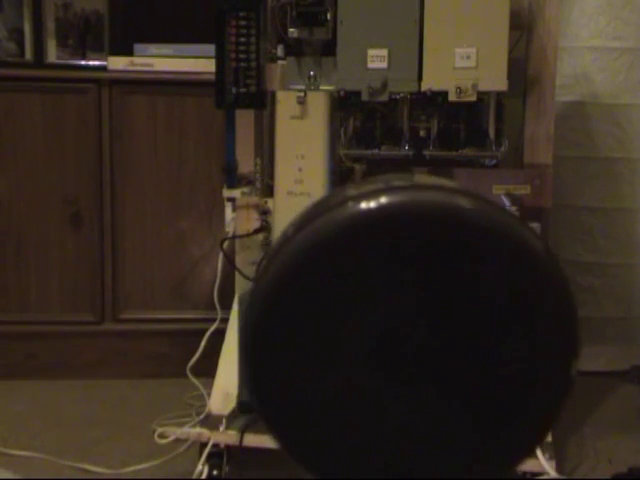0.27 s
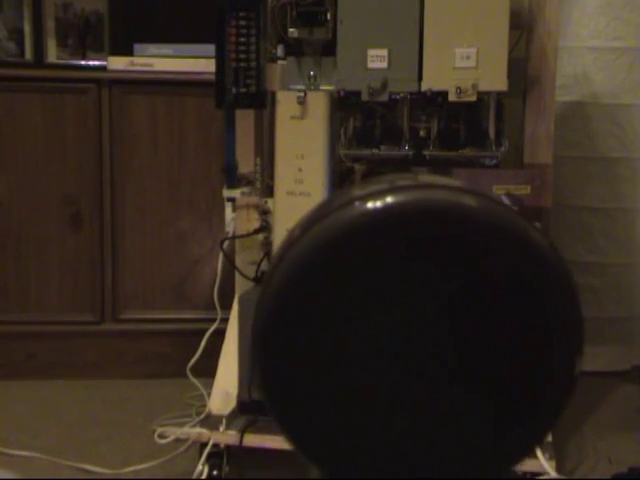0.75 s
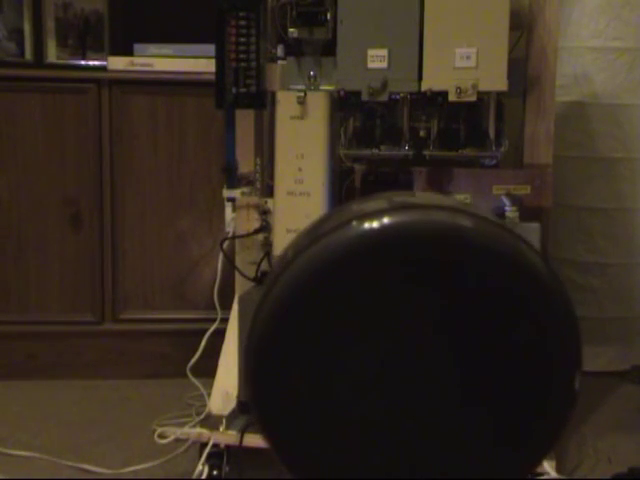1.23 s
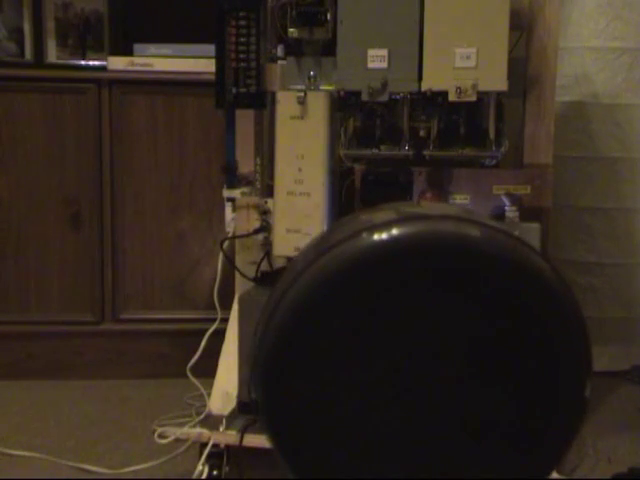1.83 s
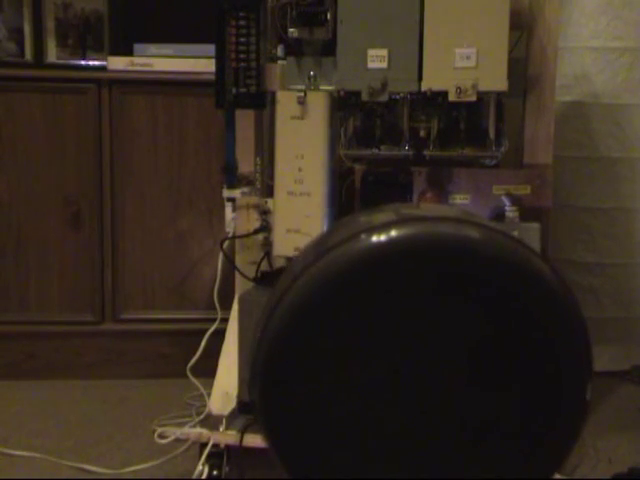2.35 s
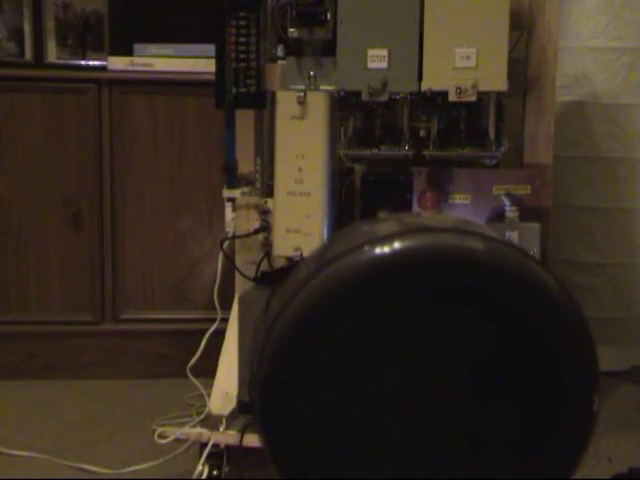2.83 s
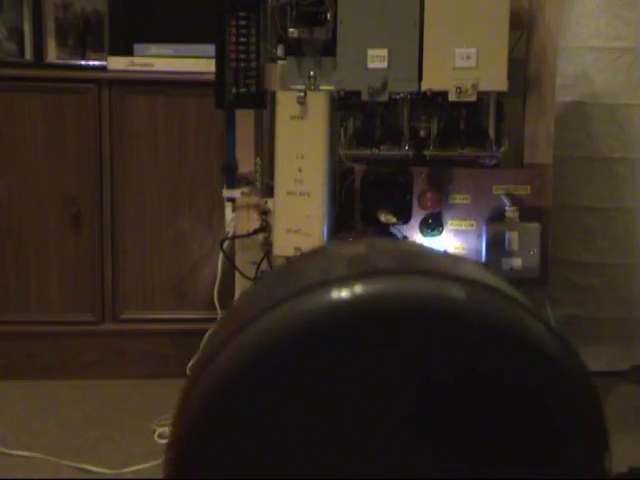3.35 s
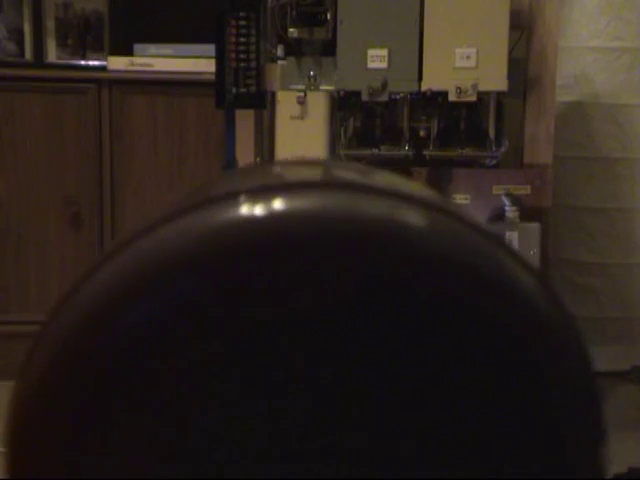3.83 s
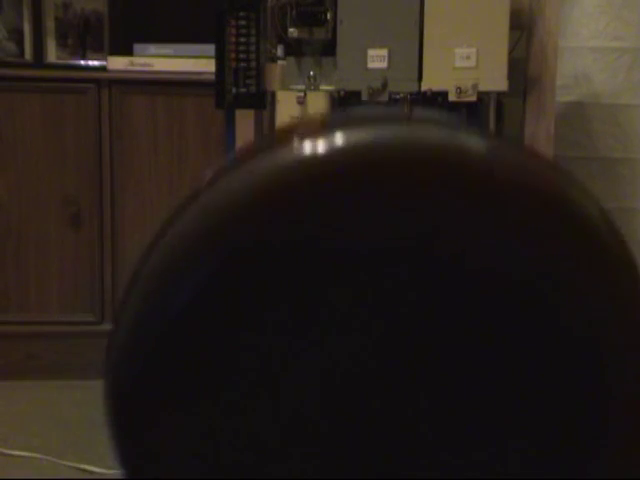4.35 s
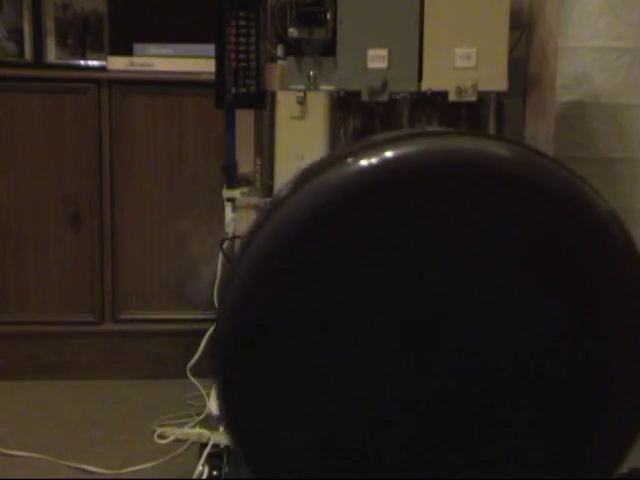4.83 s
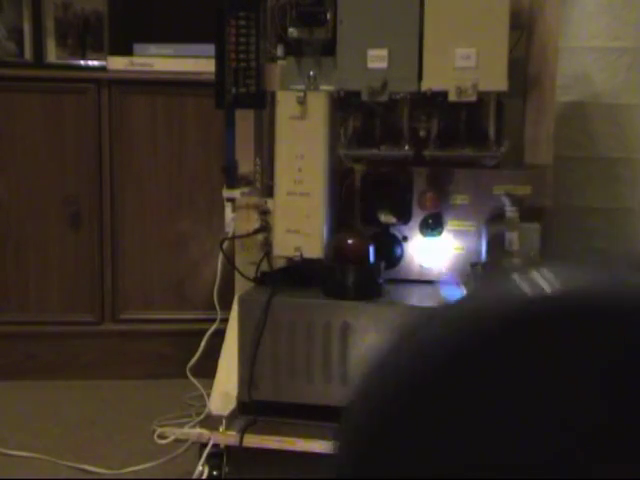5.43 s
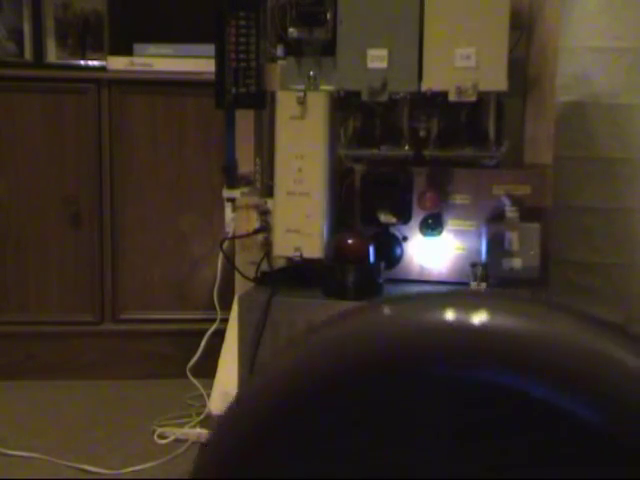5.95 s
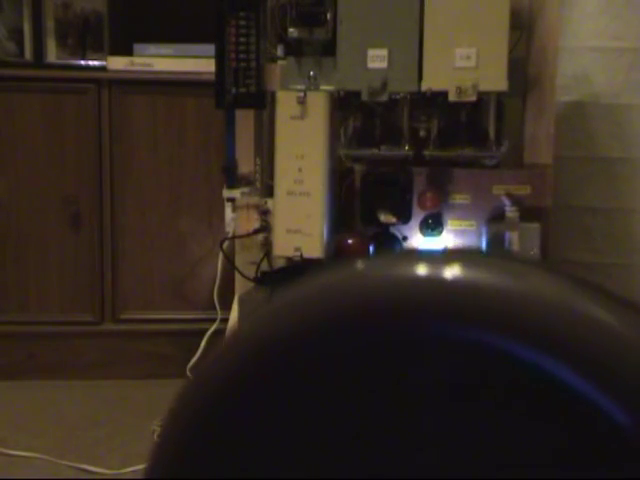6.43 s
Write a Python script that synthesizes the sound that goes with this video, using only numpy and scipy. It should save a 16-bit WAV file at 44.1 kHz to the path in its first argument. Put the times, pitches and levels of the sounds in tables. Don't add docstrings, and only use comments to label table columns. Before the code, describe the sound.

Close to the microphone, a rotary dial whirs home, then is wound up with quick ratchet clicks and a hard knock at the finger stop. Across a carpeted, furnished room, relays clack and a selector steps six times, ringing its steel rack. A slower wind follows, then ten sharp double clacks in an even burst. The dial settles and the hook switch snaps. Faint hum and hiss throughout.

```python
import sys
import numpy as np
from scipy import signal
from scipy.fft import rfft, irfft, next_fast_len
from scipy.io import wavfile
from scipy.ndimage import uniform_filter1d

SR = 44100
rng = np.random.default_rng(int(sys.argv[2]) if len(sys.argv) > 2 else 0)


def wav_out(sig):
    wavfile.write(sys.argv[1], SR, np.round(np.clip(np.atleast_2d(sig).T, -1, 1) * 32767).astype(np.int16))


def undo_db(level):
    steps = np.asarray(level, float) / 20
    return 10 ** steps


N = 294940

# multiple, level_db [rms]
HUM = [(1, -57), (2, -67), (3, -64), (6, -68)]
# pitch_hz, level_db [rms]
WHINE = [(3601, -74), (3903, -74), (4199, -72), (5098, -76), (6428, -72), (6589, -75), (6675, -71),
         (7165, -70)]
MAINS_HZ = 99.9
BUZZ_FROM, BUZZ_TO = 9, 26
HUM_BUZZ_DB, HUM_SCATTER_DB = -69.5, 2.5
# pitch_hz, level_db [per Hz]
HISS_TONE = [(15, -42), (25, -4), (69, -8), (102, -5), (140, -3.5), (207, -3), (229, -11), (298, -5),
             (366, -9.5), (586, -6.5), (900, -8.5), (1400, -7), (2460, -18.5), (2950, -19.5), (6620, -15),
             (11100, -21), (12700, -32), (16500, -79), (22000, -120)]
HISS_DB = -50.5
ROOM_T60_S, ROOM_TREBLE_T60_S = 0.3, 0.17

# time_s, level_db
WHIR = [
    [(0.0, -31.5), (0.172, -42.5), (0.41, -38.5)],
    [(0.84, -51), (1.018, -46), (1.098, -45), (1.224, -39), (1.488, -41.5), (1.63, -37.5)],
    [(2.33, -48), (2.514, -47.5), (2.616, -46.5), (2.848, -52), (3.004, -43), (3.12, -39), (3.252, -45.5),
     (3.346, -48), (3.5, -67)],
    [(4.68, -51), (4.746, -42.5), (4.89, -43), (4.98, -35.5)],
    [(6.01, -31), (6.07, -27), (6.15, -56), (6.256, -45), (6.392, -54), (6.47, -55)],
]
# time_s, level_db
BRAKE = [
    [(0.0, -49), (.092, -61), (.105, -61), (.17, -54), (.195, -45), (.3, -45.5), (.41, -43)],
    [(1.03, -64), (1.05, -55), (1.29, -38.5), (1.33, -54), (1.385, -46), (1.41, -47), (1.585, -43.5),
     (1.615, -31.5), (1.64, -39)],
    [(2.33, -54), (2.42, -52), (2.55, -60), (2.78, -56), (2.9, -50), (3.0, -47), (3.25, -44.5), (3.3, -54),
     (3.45, -73)],
    [(4.68, -60), (4.76, -48.5), (4.93, -50), (4.955, -38), (4.976, -30), (4.99, -30)],
    [(6.01, -45), (6.15, -56), (6.2, -63), (6.256, -55), (6.392, -54), (6.47, -57)],
]
# pitch_hz, level_db [per Hz]
DIAL_BODY_TONE = [(120, -27), (200, -21), (308, 8), (448, 2.5), (489, 9), (869, -1), (1210, -2),
                  (1320, 4.5), (1530, -12), (1650, 1), (1800, -4.5), (2150, -6.5), (2800, -37), (3640, -20),
                  (6160, -120)]
SCRAPE_TONE = [(1650, -18), (2800, -1), (5140, -5.5), (6480, -4.5), (9850, -9), (11500, -12), (11800, -5),
               (12500, -83), (16200, -110), (22000, -120)]

# start_s, peak_db
QUICK_WIND = [(1.138, -25), (1.144, -27), (1.1635, -23.5), (1.1885, -23.5), (1.212, -24), (1.239, -23.5),
              (1.2595, -24), (1.263, -22.5), (1.278, -23), (1.298, -27)]
# start_s, peak_db
LONG_WIND = [(2.9297, -25), (2.9542, -22), (2.9896, -21.5), (3.0285, -22.5), (3.057, -26), (3.0804, -34),
             (3.085, -25)]
# start_s, peak_db
LATE_WIND = [(2.9238, -38), (3.057, -24), (3.0804, -22.5), (3.1023, -19.5), (3.1238, -21.5), (3.131, -30),
             (3.1582, -27), (3.17, -34), (3.1964, -25), (3.2331, -24.5)]
# start_s, peak_db, thud_db [into the case]
FINGER = [(0.195, -32, -9), (0.332, -33, -25), (1.0781, -13, -19), (1.0827, -21, -24), (1.3975, -28, -17),
          (2.8317, -18.5, -25), (2.836, -17.5, -29), (4.685, -33, -8), (4.7631, -28, -12),
          (4.7894, -32, -2.5)]
# start_s, peak_db, thud_db, left_minus_right_db
FINGER_STOP = [
    (1.286, -2.5, -19, -0.5),
    (1.329, -24.5, -4.5, -0.5),
]
# start_s, peak_db, thud_db, left_minus_right_db
NAIL = [(3.2645, -16, -18.5, 1)]
# start_s, peak_db, thud_db, left_minus_right_db
SLIP = [(.066, -26.5, 15, -2.1), (.975, -41, 5, -1.8), (1.040, -18, -7, 0.66), (2.792, -17.5, -21, 1.1),
        (2.922, -23, -39, 1.7), (3.36, -36.5, -20, 0)]
# start_s, peak_db
TICKS = [(.0634, -21), (.078, -33), (.1166, -36), (.174, -39), (.1935, -28), (1.3707, -37), (1.3961, -27),
         (2.414, -34.5), (6.2035, -33.5)]
# start_s, peak_db
RELEASE = [(6.209, -32), (6.238, -25), (6.297, -25.5), (6.302, -30), (6.31, -32), (6.3135, -27.5),
           (6.318, -25), (6.345, -32)]
# start_s, peak_db
HOOK = [
    (6.4715, 0.5),
    (6.4866, -32),
    (6.5021, -12),
    (6.5047, -7.5),
    (6.5382, -10.5),
]
# pitch_hz, level_db [per Hz]
RATCHET_TONE = [(180, -42), (300, -30), (2430, 1.5), (3640, -6), (4330, -2), (4980, -0.5), (6290, -1),
                (9890, -5), (11700, -14), (12500, -51), (16200, -81), (22000, -120)]
FINGER_TONE = [(180, -43), (300, -9.5), (1130, -8), (2320, -13.5), (2880, -2.5), (3640, -13), (4600, -9),
               (5820, -14), (10400, -24.5), (12500, -60), (16200, -88), (22000, -120)]
STOP_TONE = [(120, -50), (200, -46), (483, 12), (616, -5), (1000, -3), (2370, -14), (3300, -18),
             (4000, -30), (10300, -27), (11100, -36), (12500, -84), (16200, -114), (22000, -120)]
SLIP_TONE = [(180, -35), (300, -12), (1060, -1.5), (1520, -5.5), (1640, -3.5), (5470, -16), (8730, -13),
             (11200, -16.5), (12500, -65), (16200, -95), (22000, -120)]
HOOK_TONE = [(120, -52), (200, -15), (2070, -6.5), (2870, 3.5), (4130, -0.5), (8690, -19), (9640, -29),
             (11500, -23), (12500, -62), (16200, -92), (22000, -120)]
# pitch_hz, level_db, t60_s
RATCHET_RING = [(1342, -10.5, 0.055), (4350, -5.5, 0.025), (4440, -6, 0.011), (9200, -17, .015)]
LATE_RATCHET_RING = [(1340, -8, .05), (6570, -0.5, 0.007), (7420, 0, 0.0076), (4300, -18, 0.028)]
NAIL_RING = [(1400, -13, 0.054), (2570, -8, 0.038), (4530, -8, 0.019), (8500, -12, 0.007),
             (10350, -5, .008)]
RELEASE_RING = [(1310, -2, 0.055), (1600, -2.5, 0.031), (1830, -5, 0.027), (2300, -7, .02),
                (3280, -1, 0.031)]
STOP_RING = [(2170, -12, 0.037), (10800, -25, 0.054)]
TICK_RING = [(5030, 1, .008), (6400, 3, 0.011), (7430, -6, 0.01)]
# pitch_hz, level_db, t60_s
CASE = [(342, -4.5, 0.1), (407.4, -9.5, 0.27), (497, -4, 0.1), (594, 2.5, 0.047), (1338, -1, 0.074),
        (2030, -15, 0.13), (4270, -14, 0.03)]

# start_s, peak_db, thud_db, left_minus_right_db
RELAYS = [(0.0014, -17, -34, -1), (0.0457, -14.5, -19, 2), (0.4843, -23, -6, 6), (.5565, -44, -12, 0),
          (.6575, -37, -8, 0), (0.748, -18, -27, 1), (0.7592, -14.5, -24, -1), (0.7901, -27, -11, 6),
          (1.6088, -21, -13, -3), (2.5011, -23, -20, 1), (4.9494, -36, -28, -1)]
# start_s, peak_db, thud_db, left_minus_right_db
HUNT = [
    (0.426, -6, -13.5, 1),
    (0.4978, -9, -8.5, -1.5),
    (0.6985, -6.5, -20, -1),
    (0.7003, -31, 1, -6),
]
# start_s, peak_db
BUZZ = [(.403, -11), (.410, -13), (.417, -11), (.4265, -6.5), (.4985, -14), (.687, -11), (.692, -1),
        (1.617, -13.5), (1.626, -14.5), (4.978, -12), (4.981, -5.5), (6.222, -18), (6.24, -16.5),
        (6.494, -21)]
# start_s, period_s, peak_db, thud_db, left_minus_right_db
FIRST_PULL = (1.6305, .1051, -3, -17, -2.5)
FINAL_PULL = (4.9862, .10456, -2, -7.5, -1)
# start_s, peak_db
FIRST_DROP = [(1.6909, -4), (1.7978, -4), (1.9016, -5), (2.0063, -3.5), (2.1111, -4.5), (2.2152, -5)]
FINAL_DROP = [(5.0609, -6), (5.1637, -2), (5.2707, -3), (5.3741, -3), (5.4782, -3), (5.5836, -2.5),
              (5.688, -2.5), (5.792, -4.5), (5.8971, -3), (6.0004, -4)]
# peak_db, thud_db
FIRST_CLIMB = (0.21, -1.8)
FINAL_CLIMB = (-0.2, 0.14)
COLD_COIL_S = 0.0053
# pitch_hz, level_db [per Hz]
RELAY_TONE = [(180, -43), (300, -37), (543, 0), (908, -2.5), (1260, -13), (2140, -7.5), (3320, 1),
              (11400, -12.5), (12500, -43), (16200, -68), (22000, -120)]
CONTACT_TONE = [(300, -26), (3000, -3), (6000, -11.5), (7500, -7), (10500, -9), (12500, -50)]
HUNT_TONE = [(180, -1), (300, 2), (450, 4), (1220, -2), (1450, 1.5), (2110, -3), (2580, -3), (6190, -6.5),
             (10500, -10), (11700, -19), (12500, -35)]
BUZZ_TONE = [(180, -24), (300, -6), (4000, -9), (5640, -10), (6290, -11), (7830, -6), (9150, -5.5),
             (9590, -10), (11400, -6), (12500, -18), (16200, -58), (22000, -120)]
PAWL_TONE = [(180, -40), (270, -6), (380, -5), (550, -12), (1000, -18), (3000, -38), (12000, -60)]
FIRST_PULL_TONE = [(180, -6), (300, -40), (404, -1), (1050, -10.5), (1300, -6.5), (2210, -12),
                   (4600, -10.5), (6590, -16), (10500, -15), (11700, -24), (12500, -72)]
FIRST_DROP_TONE = [(180, -39), (300, -3.5), (600, -3.5), (760, 2.5), (900, -8.5), (1470, -1.5), (1750, -6),
                   (2630, -5), (5380, -11.5), (8200, -12), (11000, -16.5), (12500, -47), (16200, -81),
                   (22000, -120)]
FINAL_PULL_TONE = [(180, -44), (300, -9), (530, -6.5), (650, -15), (830, -1.5), (952, -9.5), (1550, -1),
                   (2390, -12.5), (3370, -10), (4600, -14.5), (10700, -17.5), (11700, -36), (12500, -99)]
FINAL_DROP_TONE = [(180, -18.5), (300, 1.5), (730, -33), (1050, -3), (1180, -13), (2180, -12.5),
                   (2580, -6.5), (4600, -15.5), (8200, -13), (11200, -16.5), (12500, -53)]
# pitch_hz, level_db, t60_s
CONTACT_RING = [(3430, -2, 0.013), (7460, -7, 0.015), (9900, -17, .012)]
HUNT_RING = [(2650, -7, 0.015), (3580, -10, 0.016), (8800, -10, 0.013)]
BUZZ_RING = [(3500, -16, 0.015), (4180, -11.5, 0.02), (7570, -4, 0.016), (9400, -9, .012)]
FIRST_PULL_RING = [(1374, -17.5, 0.047), (3250, -22, 0.019), (4480, -9, 0.011), (8050, -14, .012),
                   (11100, -18.5, 0.01)]
FIRST_DROP_RING = [(742, -10.5, 0.035), (1370, -16, 0.03), (2620, -11.5, .025), (3350, -15, 0.023),
                   (8300, -7.5, 0.011), (8950, -11, .012)]
FINAL_PULL_RING = [(1110, -17.5, 0.031), (1305, -14.5, 0.016), (1410, -19, 0.02), (1640, -27, 0.021),
                   (2600, -16, 0.033), (3494, -12.5, 0.022)]
FINAL_DROP_RING = [(2680, -12, 0.022), (3420, -14.5, 0.021), (5400, -15, 0.0075), (5550, -7.5, 0.0087),
                   (7700, -17, 0.011), (8200, -8, 0.01), (9000, -15, 0.011)]
# pitch_hz, level_db, t60_s
SHELF = [(335, -13, 0.18), (424, 0.5, 0.17), (454, -1.5, 0.28), (507, -3, 0.25), (590, -9, 0.2),
         (800, 4.5, 0.099)]
RACK = [(122, -22, .5), (160, -17, .5), (205, -17, .3), (266, 0.5, .22), (309, 2.5, .22), (388, 2.5, .15),
        (430, -9, .1), (465, -12, .1), (501, -9, .1), (552, -8, .1), (650, -9, .1), (715, -7, .1),
        (844, -2, .14), (1080, -7, .1)]
FIRST_SEAT_DB = [16, 2.5, 0, 0.8, 0, 5.5, 7, -4, -12, 14, -9, 0, 1, 20]
FINAL_SEAT_DB = [-6, 1, -4.5, -2.5, 2, 1.1, 2, -4, 0, 2.5, -5, 3, -0.2, 5.5]

RING_SCATTER_DB = 2.5
ALIKE_BELOW_HZ = 1500
BOUNCE_SCATTER = 0.5
# pitch_hz, left_minus_right_db
PORTS = [(60, -9), (110, -3.5), (200, 2), (350, -1), (640, -0.5), (1150, -3), (2080, -3.0), (3760, -1),
         (6790, 0), (10500, 0.5), (11600, -2.5)]
TOP_HZ = 11380


def tone(table, hz):
    f, db = np.transpose(table)
    return undo_db(np.interp(np.log(np.maximum(hz, 1)), np.log(f), db))


def coloured(x, table):
    size = next_fast_len(N)
    y = irfft(rfft(x, size) * tone(table, np.fft.rfftfreq(size, 1 / SR)), size)[..., :N]
    return y / np.sqrt(np.mean(y ** 2))


def alike(rows, *shared):
    return np.array([[*row, *shared] for row in rows])


def before(events, lead_s, db):
    return np.array(events) + [-lead_s, db, 0, 0]


def train(rule, count, climb=(0, 0), first_late_s=0):
    start, period, peak_db, thud_db, pan_db = rule
    k = np.arange(count)
    s = start + k * period + first_late_s * (k == 0)
    return np.transpose([s, peak_db + climb[0] * k, thud_db + climb[1] * k, pan_db + 0 * k])


def ring(hz, gain, t60, length):
    pole = (2j * np.pi * hz - np.log(1000) / t60) / SR
    coarse = np.exp(np.outer(pole, np.arange(0, length * SR, 64))).astype(np.complex64)
    fine = np.exp(np.outer(pole, np.arange(64))).astype(np.complex64)
    modes = (coarse[:, :, None] * fine[:, None, :]).imag.reshape(len(hz), -1)
    rows = gain.reshape(-1, len(hz)).astype(np.float32)
    return (rows @ modes).reshape(*gain.shape[:-1], -1).astype(float)


def body(table, t60, slope, crack, hits, rings, repeats, count=170):
    u = (np.arange(count) + rng.random(count)) / count
    hz = 200 + 12400 * u ** 1.3
    decay = np.clip(t60 * (hz / 1000) ** -slope, .003, .4)
    sign = np.sign(rng.standard_normal((hits, 2, count)))
    sign = np.where(repeats & (hz < ALIKE_BELOW_HZ), sign[:1], sign)
    gain = tone(table, hz) * np.sqrt(u ** .3 / decay) * sign
    y = ring(hz, gain, decay, .15)
    y = y * (1 + crack * np.exp(-np.arange(y.shape[2]) / (.003 * SR)))
    f, spec = np.fft.rfftfreq(y.shape[2], 1 / SR), rfft(y)
    smooth = uniform_filter1d(np.abs(spec) ** 2, size=12) + 1e-12
    spec = spec * tone(table, f) / np.sqrt(smooth)
    spec[:, 1] *= np.clip(f / 1300, 0, 1) / (1 + f / 30000)
    y = irfft(spec)[..., :-512]
    y = y / np.abs(y[:, :1]).max(axis=2, keepdims=True)
    clear = np.zeros_like(y[:, 0])
    if rings:
        hz, db, decay = np.transpose(rings)
        gain = undo_db(db + RING_SCATTER_DB * rng.standard_normal((hits, len(hz))))
        clear = ring(hz, gain, decay, .15)[:, :y.shape[2]]
    return y[:, 0], y[:, 1], clear


def even(blows):
    size = 2 * blows.shape[2]
    spec = rfft(blows, size)
    power = np.abs(spec) ** 2
    smooth = uniform_filter1d(power, size=max(3, size // 300)) + 1e-18
    return irfft(spec * np.sqrt(power.mean(axis=2, keepdims=True) / smooth), size)[..., :blows.shape[2]]


def strike(events, table, t60, slope, chatter_ms, db, crack=0.35, first=1.2, count=50, rings=(), repeats=False):
    s, peak_db, thud_db, pan_db = np.transpose(events)
    chance = rng.random((len(s), 2 * count))
    moments, strengths = chance[:, :count], chance[:, count:]
    if repeats:
        strengths = strengths[:1] + BOUNCE_SCATTER * (strengths - .5)
        strengths[:] = chance[:1, count:] + BOUNCE_SCATTER * (chance[:, count:] - .5)
        moments = moments[:1] + 0 * moments
    late = 3 * np.sort(moments) ** 1.05
    late[:, 0] = 0
    size = (2 * strengths - 1) * np.exp(-late) * .48
    size[:, 0] = first
    after = (late * chatter_ms / 1000 * SR).astype(int)
    at = (s * SR).astype(int)
    blows, push = np.zeros((len(s), 1, after.max() + 1)), np.zeros(N)
    np.add.at(blows, (np.arange(len(s))[:, None], 0, after), size * undo_db(peak_db + db)[:, None])
    np.add.at(push, at, first * undo_db(peak_db + thud_db))
    if repeats:
        blows = even(blows)
    mid, side, clear = body(table, t60, slope, crack, len(s), rings, repeats)
    ears = np.stack([mid + clear + .5 * side, mid + clear - .5 * side, mid], axis=1)
    ears = ears * undo_db(np.outer(pan_db, [.5, -.5, 0]))[..., None]
    sound = np.zeros((3, N + SR))
    for i, y in zip(at, signal.fftconvolve(blows, ears, axes=2)):
        sound[:, i:i + y.shape[1]] += y
    return sound[:, :N], push


def frame(push, modes, slow_ms):
    hz, db, t60 = np.transpose(modes)
    lean = 1 + .15 * np.sin(hz) * np.array([[1], [-1]])
    panels = ring(hz, undo_db(db) * lean, t60, .6)
    panels = panels * (1 - np.exp(-np.arange(panels.shape[1]) / (SR * slow_ms / 1000)))
    return signal.oaconvolve(push[None], panels, axes=1)[:, :N]


def hum_and_hiss():
    t = np.arange(N) / SR
    sway = np.cumsum(rng.standard_normal(N)) * 0.0062
    mid, side = rng.standard_normal((2, N))
    buzz = [(k, HUM_BUZZ_DB + HUM_SCATTER_DB * rng.standard_normal()) for k in range(BUZZ_FROM, BUZZ_TO + 1)]
    lines = [(k * MAINS_HZ, db) for k, db in HUM + buzz] + WHINE
    hum = np.zeros(N)
    for k, (hz, db) in enumerate(lines):
        hum += np.sqrt(2) * undo_db(db) * np.sin(2 * np.pi * hz * t + sway + k * k)
    drift = undo_db(1.4 * uniform_filter1d(rng.standard_normal(N), size=6000) * np.sqrt(6000))
    hiss = coloured(np.array([mid + 0.38 * side, mid - 0.52 * side]), HISS_TONE)
    return hum + drift * undo_db(HISS_DB) * hiss


def room(x):
    t = np.arange(int(.5 * SR)) / SR
    noise = rng.standard_normal((3, len(t)))
    apart = signal.sosfilt(signal.butter(1, 700, "high", fs=SR, output="sos"), noise[1:])
    noise = noise[0] + 0.5 * apart
    low = signal.sosfilt(signal.butter(1, 1500, fs=SR, output="sos"), noise)
    tail = low * undo_db(-60 * t / ROOM_T60_S) + (noise - low) * undo_db(-60 * t / ROOM_TREBLE_T60_S)
    tail = tail * np.clip(t / .008, 0, 1) / np.sqrt(SR * .02)
    spec = rfft(tail)
    power = np.abs(spec) ** 2
    spec = spec * np.sqrt(uniform_filter1d(power, size=300) / uniform_filter1d(power, size=10))
    tail = irfft(spec, len(t)) * np.clip((.45 - t) / .15, 0, 1)
    return signal.oaconvolve(x.mean(axis=0, keepdims=True), tail, axes=1)[:, :N]


def turning(turns):
    t = np.arange(N) / SR
    return sum(undo_db(np.interp(t, *np.transpose(turn), left=-120, right=-120)) for turn in turns)


def whir():
    grains = rng.standard_normal((2, N))
    grains = grains * undo_db(1.74 * uniform_filter1d(rng.standard_normal(N), size=130) * np.sqrt(130))
    grains = grains[0] + 0.21 * grains[1] * np.array([[1], [-1]])
    return turning(WHIR) * coloured(grains, DIAL_BODY_TONE) + turning(BRAKE) * coloured(grains, SCRAPE_TONE)


def telephone():
    teeth = np.vstack([alike(QUICK_WIND, -21.0, -0.2), alike(LONG_WIND, -25, 0.1)])
    late_teeth = alike(LATE_WIND, -29, 0.1)
    latch = alike(RELEASE, -26, -3.0)
    parts = [
        strike(teeth, RATCHET_TONE, 0.18, 0.26, 5.0, -4.0, crack=1.3, first=1.22, rings=RATCHET_RING),
        strike(late_teeth, RATCHET_TONE, 0.063, 0.38, 4.1, -7, crack=1.9, first=1.5, rings=LATE_RATCHET_RING),
        strike(alike(FINGER, -0.29), FINGER_TONE, 0.088, 0.63, 11.0, -3.5, crack=2.2, first=1.5),
        strike(alike(TICKS, -24, 0.1), CONTACT_TONE, 0.032, 0.58, 1.3, -3.5, first=0.71, rings=TICK_RING),
        strike(NAIL, BUZZ_TONE, 0.058, 0.58, 3.1, -6, crack=1.9, first=1.36, rings=NAIL_RING),
        strike(SLIP, SLIP_TONE, 0.075, 0.7, 15.0, 2.9, crack=0.36, first=0.34),
        strike(latch, SLIP_TONE, 0.17, 0.18, 2.1, -2.7, crack=0.29, first=0.22, rings=RELEASE_RING),
        strike(FINGER_STOP, STOP_TONE, 0.035, 0.34, 4.1, -4.5, crack=0.68, first=1.34, rings=STOP_RING),
        strike(alike(HOOK, -45, -0.3), HOOK_TONE, 0.013, 0.081, 1.0, -1.8, crack=1.3, first=0.8, count=12)]
    sound, push = map(sum, zip(*parts))
    return sound, frame(push, CASE, slow_ms=1.6) + whir()


def line_finder():
    buzz = alike(BUZZ, -17, -0.61)
    parts = [
        strike(HUNT, HUNT_TONE, 0.067, 0.89, 28.0, 0.72, crack=1.8, first=1.7, count=150, rings=HUNT_RING),
        strike(buzz, BUZZ_TONE, 0.074, 0.17, 8.5, 0.82, crack=0.13, first=0.32, rings=BUZZ_RING)]
    sound, push = map(sum, zip(*parts))
    return sound, frame(push, SHELF, slow_ms=24.0)


def relays(first_drop, final_drop):
    pulses = np.vstack([before(first_drop, 0.0079, -8.5), before(final_drop, .007, -11.0),
                        [(6.203, -33, -25, 0.0038)]])
    return [strike(RELAYS, RELAY_TONE, 0.034, 0.1, 11.0, -0.38, first=1.0),
            strike(pulses, CONTACT_TONE, 0.36, 0.075, 1.6, -2.3, first=0.18, rings=CONTACT_RING)]


def selectors(first_pull, first_drop, final_pull, final_drop):
    final_pawl = before(final_pull, -.034, -8.5) + [0, -1.2, 0.51, 4.5]
    first_pawl = before(first_drop, -0.037, -8.5) + [0, -1.5, 0, 0.0]
    return [
        strike(first_pull, FIRST_PULL_TONE, 0.09, 0.92, 11.0, 2.97, crack=1.3, first=0.61,
               rings=FIRST_PULL_RING, repeats=True),
        strike(first_drop, FIRST_DROP_TONE, 0.1, 0.56, 9.0, 2.7, crack=1.4, first=0.82,
               rings=FIRST_DROP_RING, repeats=True),
        strike(final_pull, FINAL_PULL_TONE, 0.045, 0.4, 11.0, 3.0, crack=1.4, first=0.45,
               rings=FINAL_PULL_RING, repeats=True),
        strike(final_drop, FINAL_DROP_TONE, 0.19, 0.68, 2.5, 1.45, crack=1.05, first=0.34,
               rings=FINAL_DROP_RING, repeats=True),
        strike(final_pawl, PAWL_TONE, 0.015, 0.73, 1.0, -8.5, repeats=True),
        strike(first_pawl, PAWL_TONE, 0.039, 0.41, 1.05, -12.0, repeats=True)]


def exchange():
    first_pull = train(FIRST_PULL, count=6, climb=FIRST_CLIMB, first_late_s=COLD_COIL_S)
    first_drop = alike(FIRST_DROP, -16.5, -1.7)
    final_pull = train(FINAL_PULL, count=10, climb=FINAL_CLIMB)
    final_drop = alike(FINAL_DROP, -11.5, -0.53)
    parts = selectors(first_pull, first_drop, final_pull, final_drop) + relays(first_drop, final_drop)
    sound, push = map(sum, zip(*parts))
    final = np.arange(N) > 4 * SR
    first_seat = np.array(RACK) + np.outer(FIRST_SEAT_DB, [0, 1, 0])
    final_seat = np.array(RACK) + np.outer(FINAL_SEAT_DB, [0, 1, 0])
    rack = frame(push * ~final, first_seat, slow_ms=23.0) + frame(push * final, final_seat, slow_ms=27.0)
    hunt, shelf = line_finder()
    return sound + hunt, undo_db(2.5) * rack + undo_db(1.5) * shelf


def scene():
    far, panels = exchange()
    near, case = telephone()
    reverb = room(undo_db(0.3) * far[2] + undo_db(-8.5) * (near[2] + case))
    heard = far[:2] + panels + near[:2] + case + reverb
    no_bass = signal.butter(4, 115, "high", fs=SR, output="sos")
    return signal.sosfilt(no_bass, heard) + hum_and_hiss()


def low_pass(x):
    return signal.sosfilt(signal.butter(12, 12870, fs=SR, output="sos"), x)


def record(dry):
    size = next_fast_len(N)
    tilt = np.sqrt(tone(PORTS, np.fft.rfftfreq(size, 1 / SR)))
    x = irfft(rfft(dry, size) * [tilt, 1 / tilt], size)[:, :N]
    x = .88 * np.tanh(x / .88)
    x = signal.sosfilt(signal.ellip(8, .2, 70, TOP_HZ, fs=SR, output="sos"), x)
    return low_pass(x)


dry = scene()
out = record(dry)
wav_out(out)
```